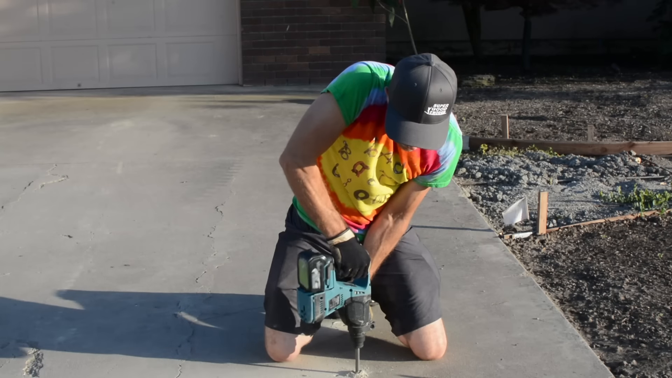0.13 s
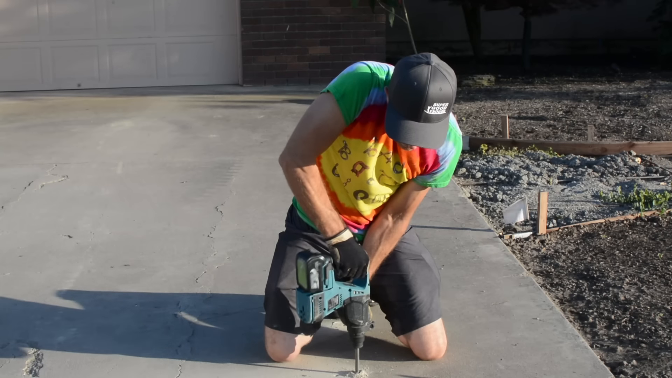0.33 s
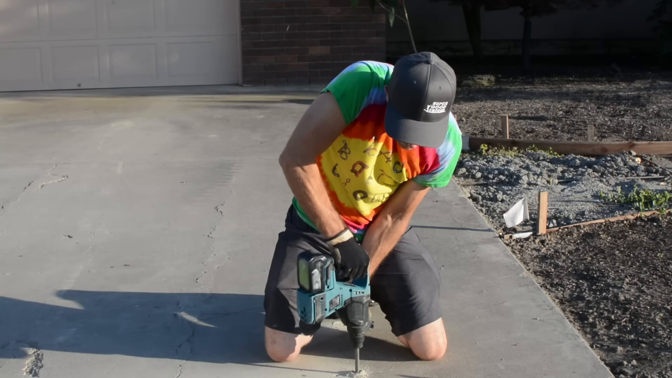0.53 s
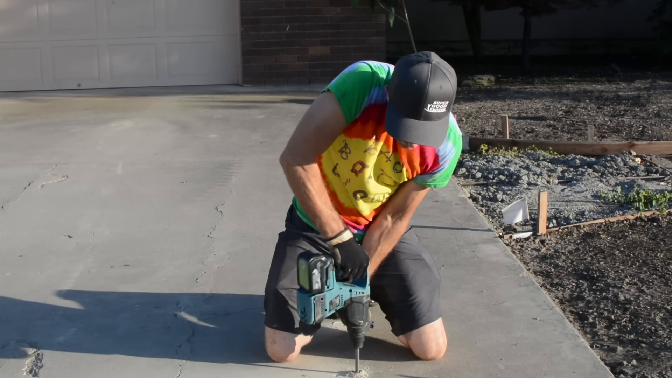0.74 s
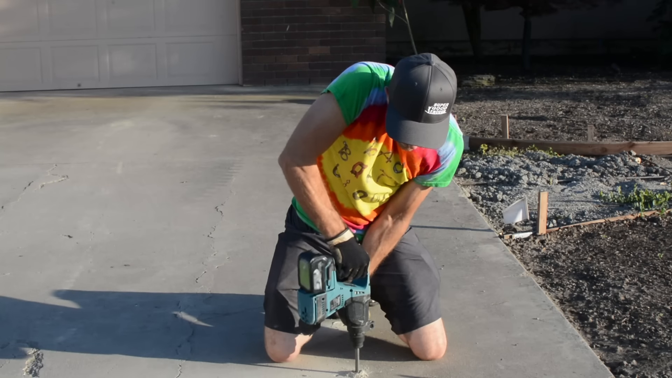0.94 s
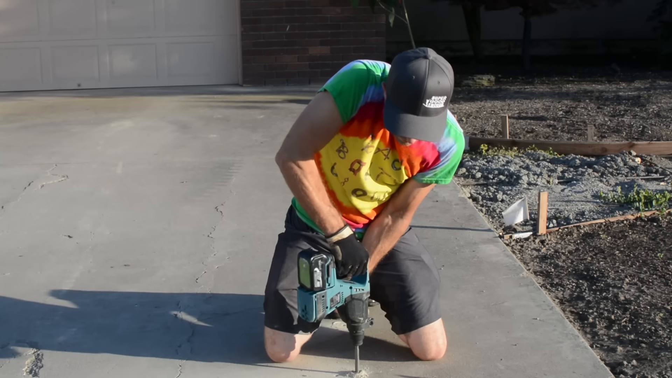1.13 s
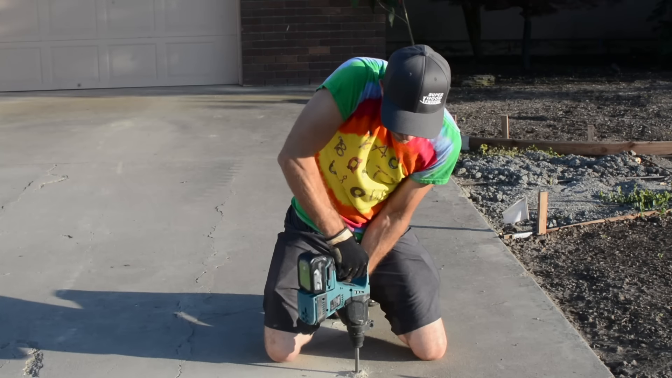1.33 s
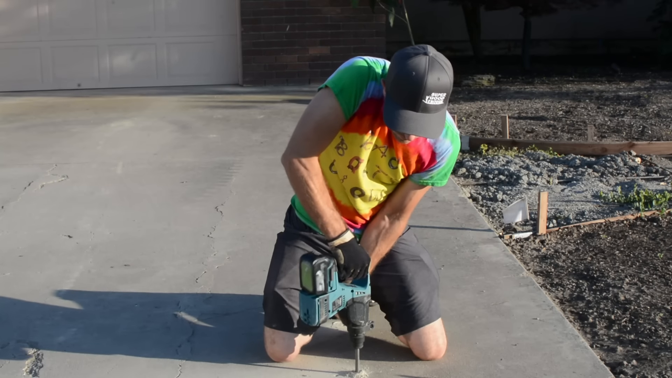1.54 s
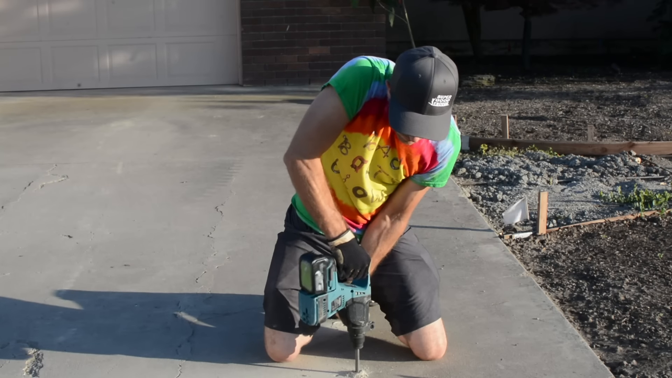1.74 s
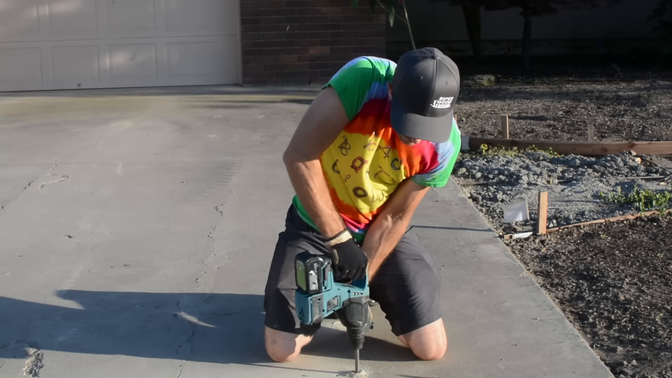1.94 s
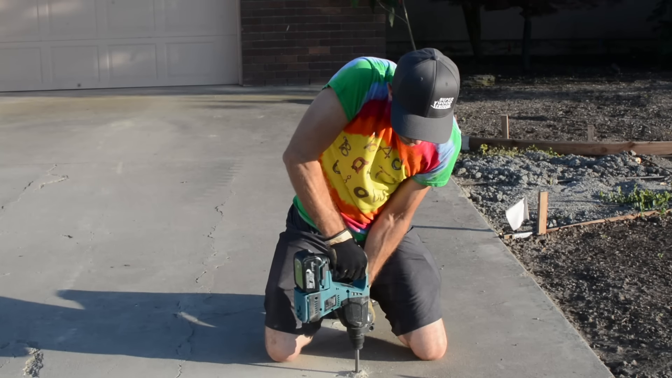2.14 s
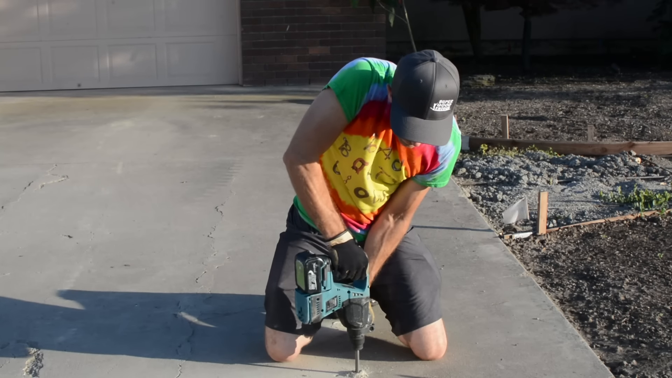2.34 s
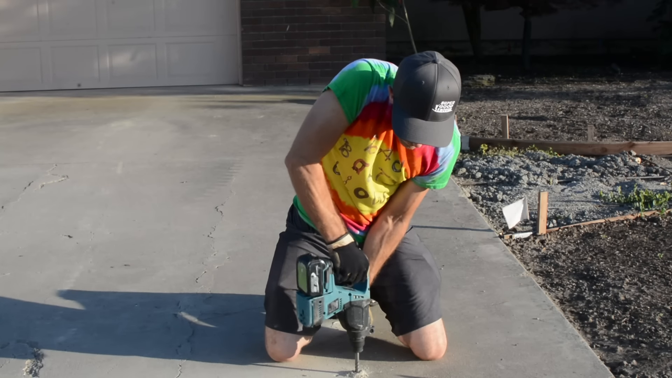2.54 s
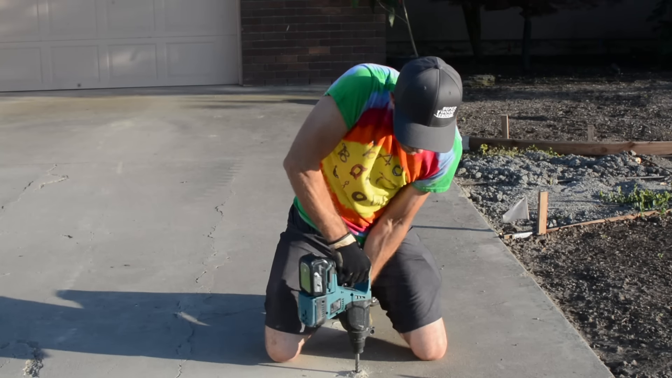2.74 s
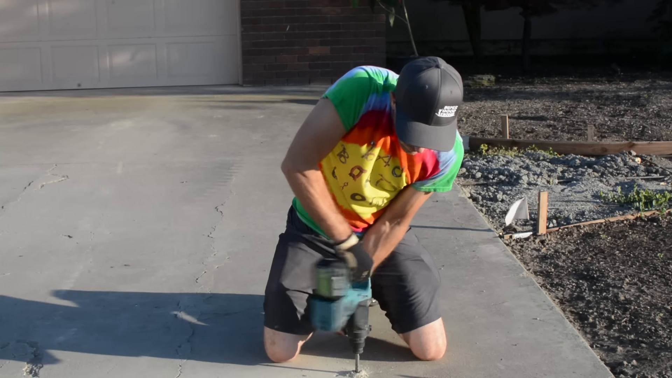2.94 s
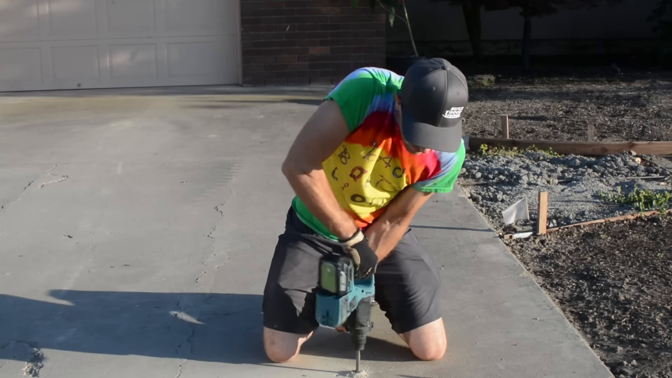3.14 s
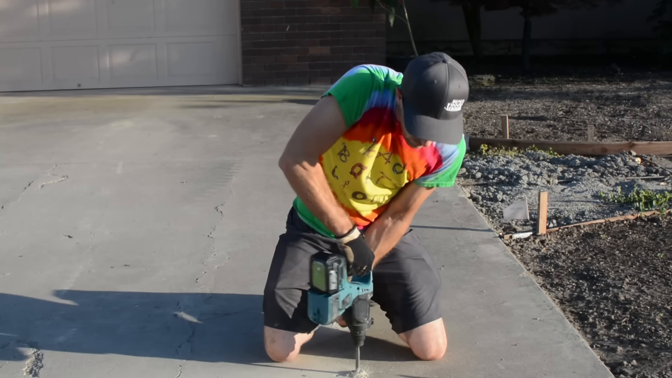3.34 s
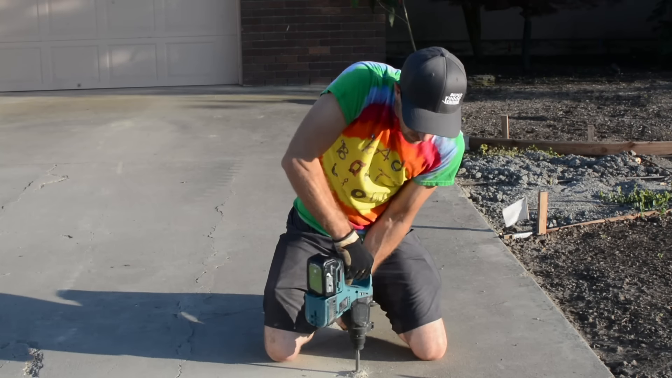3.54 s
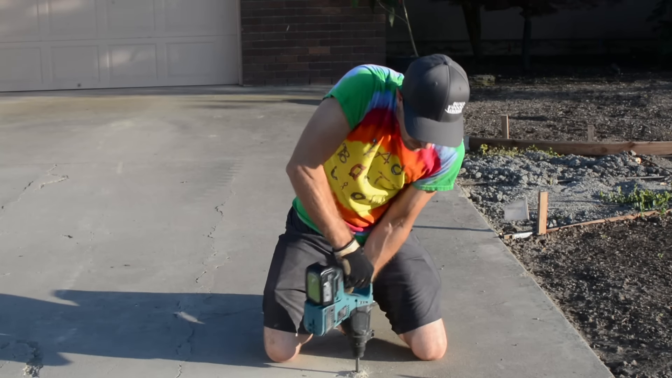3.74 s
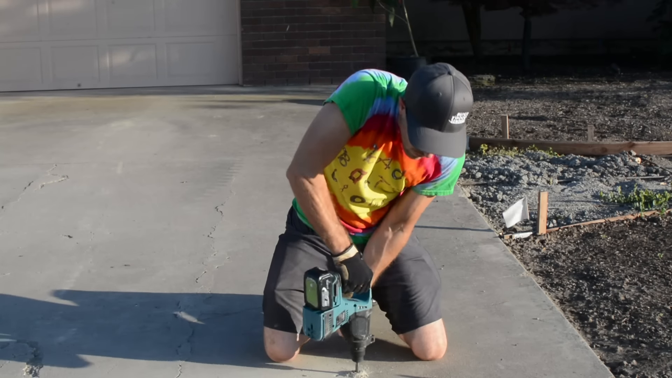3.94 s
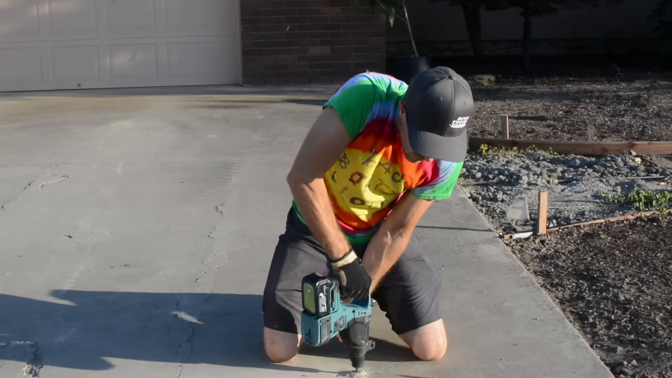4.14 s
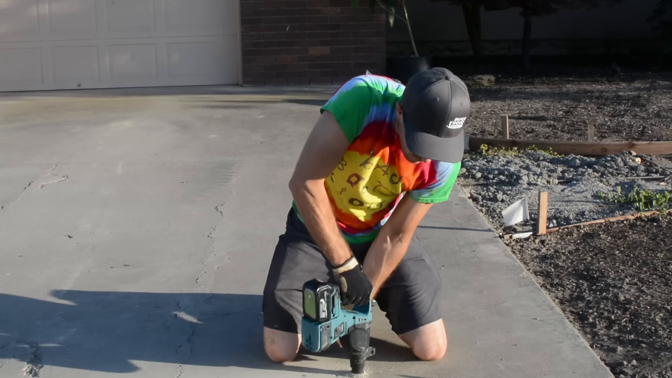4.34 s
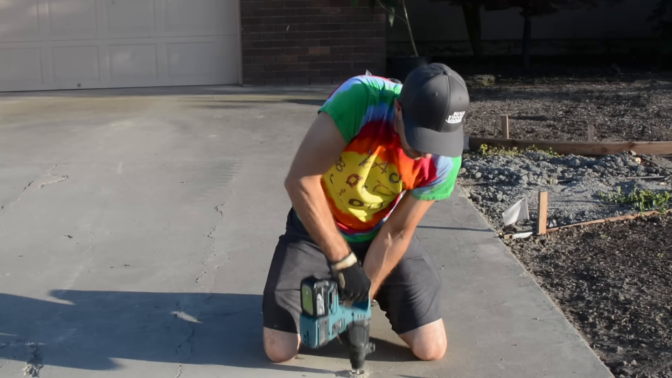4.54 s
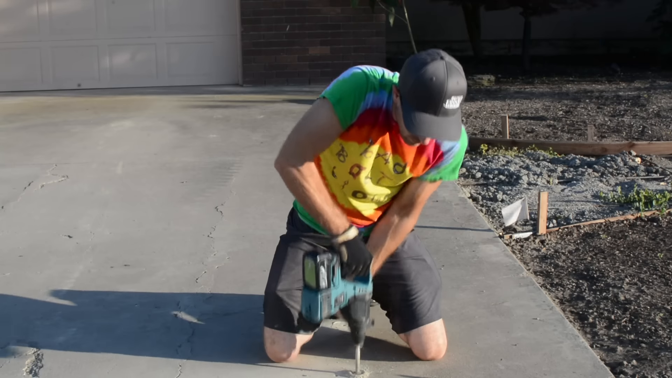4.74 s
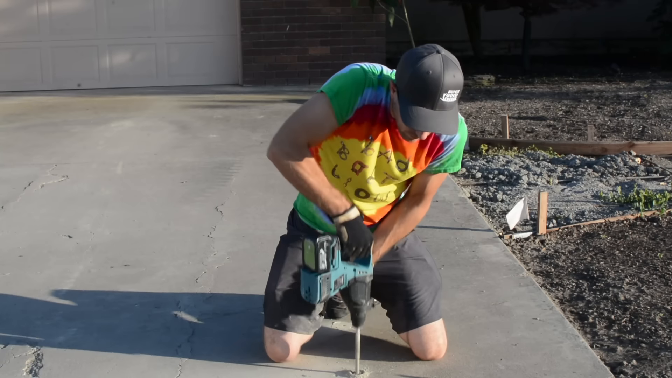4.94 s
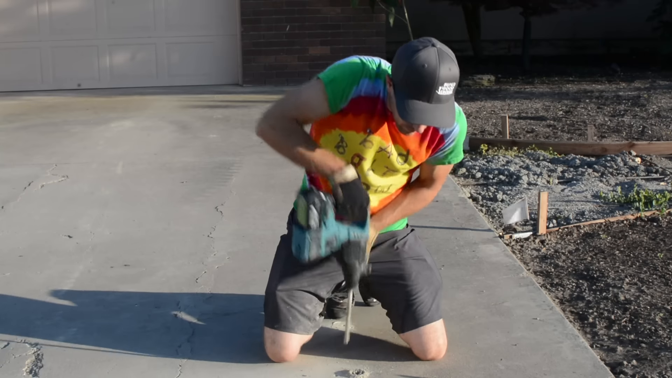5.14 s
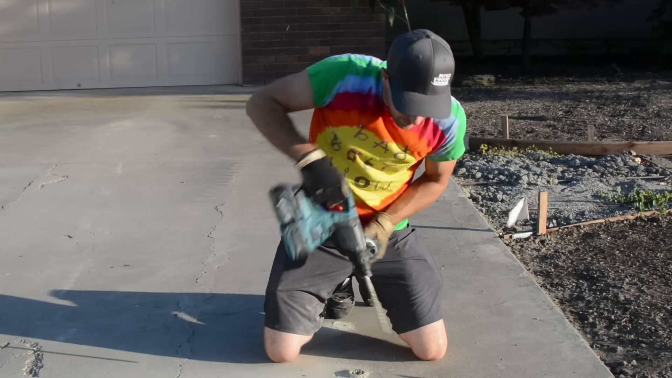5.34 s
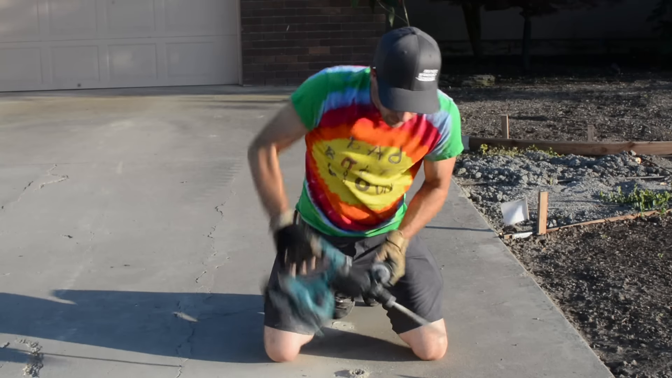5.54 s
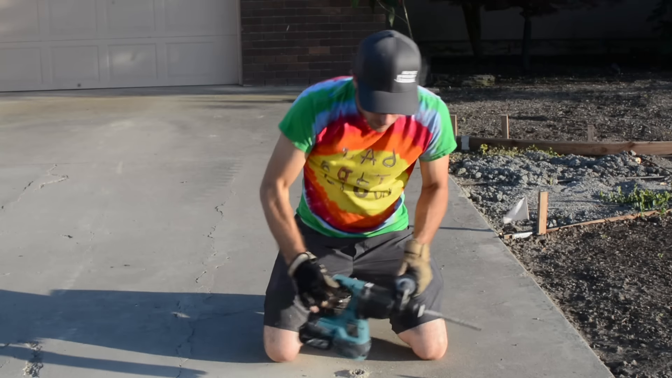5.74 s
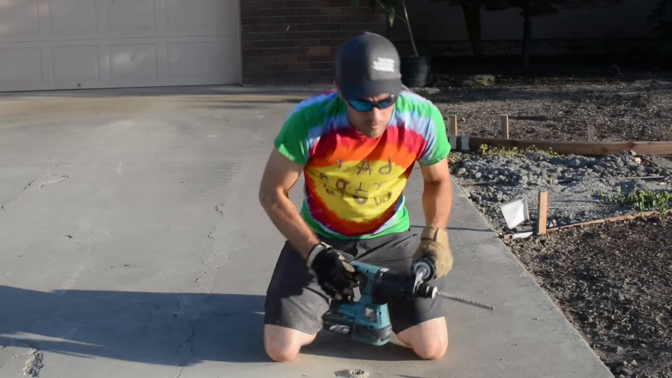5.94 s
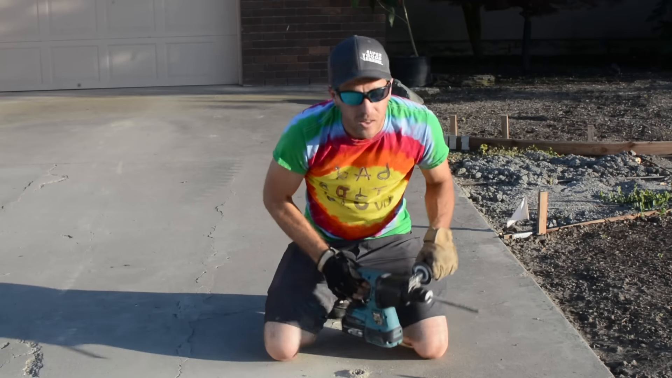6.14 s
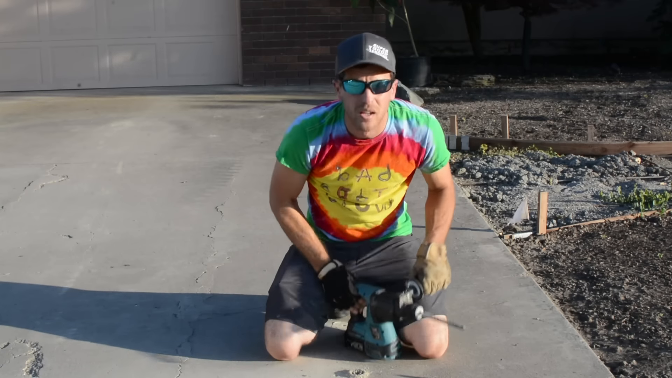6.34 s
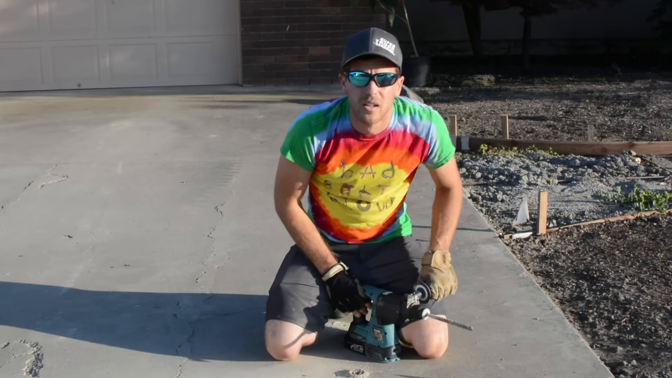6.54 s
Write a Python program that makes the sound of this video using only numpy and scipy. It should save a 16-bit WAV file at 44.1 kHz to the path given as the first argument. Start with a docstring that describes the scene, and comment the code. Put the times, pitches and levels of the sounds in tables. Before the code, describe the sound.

Close outdoor view of a cordless hammer drill boring concrete: fast, hard, gritty blows with metallic bit ringing and clattering gears. It briefly skips, hammers again, then bucks roughly and stalls twice. A freer gear rattle and whirr follows as the bit is pulled out, then a quick stop. Quiet suburb, faint bird whistles, a tool knock. Wind bumps the microphone.

```python
"""A rotary hammer drill bores into concrete outdoors: noise bursts crack and bit modes ring over rattling gears.
The bit skips, then binds and bucks; the motor stalls twice, and the drill spins free while it is pulled out.
The trigger is let go and the brake bites; a far bird gives short whistles, and the tool is set down with a knock.
Filtered-noise wind buffets the microphone, near surfaces and a wall send the sound back, a quiet suburb lies behind."""
import sys
import numpy as np
from scipy import signal
from scipy.fft import rfft, irfft
from scipy.io import wavfile
from scipy.ndimage import uniform_filter1d, map_coordinates

SR = 44100
rng = np.random.default_rng(int(sys.argv[2]) if len(sys.argv) > 2 else 0)


def materialize(psi):
    """Save the field psi as 16-bit PCM at rate SR to the path in sys.argv[1].

    A 1-D psi becomes a single channel; in a 2-D psi each row is a channel.
    """
    bounded = np.clip(np.atleast_2d(psi).T, -1, 1)
    quanta = np.round(bounded * 32767).astype(np.int16)
    wavfile.write(sys.argv[1], SR, quanta)


N = 290619

# The march of the piston. Each row: time in seconds, strokes so far.
STROKES = [(0, 0.64), (0.1357, 10), (0.2826, 20), (0.5776, 40), (0.8794, 60), (0.9965, 68), (1.1057, 76),
           (1.4602, 103), (1.5652, 111), (1.9566, 138), (2.0756, 146), (2.3496, 165), (2.4846, 174),
           (2.6004, 181), (2.6172, 182), (2.9355, 203), (3.2, 219), (3.45, 238.56), (5.09, 367.98),
           (5.2, 374.68)]
# Tone of crushed concrete in the hole. Each row: frequency in Hz, relative spectral level in dB.
GRIND_TONE = [(130, -20.5), (220, -10.5), (290, 0), (450, 1), (800, 6), (1200, 0.5), (1600, -38.5)]


def undb(db):
    """Turn decibels into an amplitude factor."""
    return 10 ** (np.asarray(db) / 20)


def curve(table, at):
    """Read the columns of a time table at the given times, in straight lines between rows."""
    s, *columns = np.transpose(table)
    return [np.interp(at, s, column) for column in columns]


def unit(x):
    """Scale a signal to rms 1."""
    return x / np.sqrt(np.mean(x ** 2))


def noise():
    """White noise for the whole scene."""
    return rng.standard_normal(N)


def colour(x, points, tilt_db=0):
    """Minimum-phase filter through (Hz, dB) points, tilted in dB per octave, with unit gain on white noise."""
    hz, db = np.transpose(points)
    octave = np.log2(np.maximum(np.arange(2049) * SR / 4096, 1))
    level_db = np.interp(octave, np.log2(hz), db) + tilt_db * (np.maximum(octave, 7) - 10)
    # folding the cepstrum forward makes the filter causal
    cepstrum = irfft(level_db * np.log(10) / 20)
    cepstrum[1:2048] *= 2
    cepstrum[2049:] = 0
    response = irfft(np.exp(rfft(cepstrum)))
    return signal.fftconvolve(x, response / np.sqrt(np.sum(response ** 2)))[:len(x)]


def spikes(s, size):
    """Place one impulse per event."""
    out = np.zeros(N)
    np.add.at(out, np.clip((np.asarray(s) * SR).astype(int), 0, N - 1), size)
    return out


def fade(x, t60):
    """Let each impulse die away exponentially, by 60 dB in t60 seconds."""
    return signal.lfilter([1], [1, -np.exp(-np.log(1000) / (t60 * SR))], x)


def ring(x, hz, t60):
    """One damped mode whose pitch may move; a unit impulse gives an envelope that starts at 1."""
    turn = np.exp(2j * np.pi * np.cumsum(hz * np.ones(N)) / SR)
    return (1j * np.conj(turn) * fade(x * turn, t60)).real


def burst(s, size, rise, t60):
    """Envelope that swells over the contact time and then dies away."""
    k = max(int(rise * SR), 1)
    return uniform_filter1d(fade(spikes(s, size), t60), k, origin=(k - 1) // 2)


def walk(rate):
    """Random drift of rms 1: noise smoothed twice over 1/rate seconds."""
    k = int(SR / rate)
    return unit(uniform_filter1d(uniform_filter1d(noise(), k), k))


def narrow(x, hz, width_hz):
    """Noise moved into a band round a centre that may glide; rms 1."""
    slow = signal.sosfilt(signal.butter(2, width_hz / 2, fs=SR, output="sos"), x)
    return unit(slow * np.sin(2 * np.pi * np.cumsum(hz * np.ones(N)) / SR))


def stroke_times(count):
    """Times in seconds at which the piston reaches the given stroke counts."""
    s, strokes = np.transpose(STROKES)
    return np.interp(count, strokes, s)


def blows():
    """Steady strokes crack the concrete and ring the bit; the turning cutting edges shift and weight them."""
    # The bite of the bit. Each row: time in seconds, blow level in dB, ringing level in dB,
    # extra level of the lower bit modes in dB; all before the offsets and chance below.
    bite = [(0, -24, -42, -1.5), (1.0, -23.5, -42.5, 4.5), (1.12, -27, -39.5, -7), (1.15, -28.5, -45, -10),
            (1.175, -39, -53.5, -9.5), (1.3, -50, -52.5, -18.5), (1.42, -34, -49.5, -12),
            (1.46, -36.5, -44, -10), (1.52, -25, -34.5, -0.5), (1.8, -24, -33, -4.5), (2.3, -26, -34.5, -4),
            (2.6, -28, -33.5, -6.5)]
    edges_per_stroke, edge_lag_s = .395, .00069
    count = np.arange(1, 182)
    edge = 2 * np.pi * edges_per_stroke * count
    chance = rng.standard_normal((len(count), 8))
    s = stroke_times(count) + edge_lag_s * np.cos(edge) + .0004 * chance[:, 0]
    blow_db, ring_db, lower_db = curve(bite, s)
    blow_db = blow_db - 1.6 * np.sin(edge) + .65 * np.cos(edge) + 1.8 * chance[:, 1]
    ring_db = ring_db + 15.5 - 6.1 * np.sin(edge)
    buck_s, buck_db, thud_db = bucks()
    # only the hard bucks thud; light ones stay thin
    thud = np.maximum(undb(thud_db) - .2, 0)
    # a hard buck also jolts the whole tool at once
    jolt = spikes(buck_s + 0.0027, thud)
    return (concrete(s, blow_db, chance[:, 2], buck_s, buck_db, thud, jolt)
            + bit_ring(s, ring_db, lower_db, chance[:, 3:], jolt))


def concrete(s, blow_db, chance, buck_s, buck_db, thud, jolt):
    """Noise bursts crack sharply on top, while slab and housing swell later and carry on longer below."""
    # Tone of struck concrete. Each row: frequency in Hz, relative spectral level in dB.
    crack_tone = [(250, -10), (800, 3.5), (1500, 6), (2800, 5), (5000, 4.5), (6500, -3), (8000, -2),
                  (11500, -2.5), (13000, -2.5), (15800, -12)]
    low_pass, high_pass = [signal.butter(4, 4200, kind, fs=SR, output="sos") for kind in ("low", "high")]
    low = burst(s, undb(blow_db + 13.5 + 0.34 * chance), 0.0023, 0.029)
    low = low + undb(8) * burst(buck_s + .0005, thud, .0016, .018)
    # a sharp attack and a longer, weaker spray
    high = burst(s, undb(blow_db + 14.0), 0.00041, 0.0027)
    high = high + burst(s, undb(blow_db + 8.5), 0.0004, 0.013)
    high = high + burst(buck_s, undb(buck_db - 3.5), 0.00089, 0.011)
    body = signal.sosfilt(low_pass, colour(low * noise(), crack_tone))
    crack = signal.sosfilt(high_pass, colour(high * noise(), crack_tone))
    body = body + undb(3.0) * signal.sosfilt(low_pass, colour(jolt, crack_tone))
    # steel meets steel: a dry click opens every steady blow
    click = colour(spikes(s + .0002, undb(blow_db + 24.0)), crack_tone)
    # the housing answers with a short clank of drifting pitch
    clank = spikes(s + 0.00087, undb(blow_db + 10 + 2.2 * chance))
    clank = ring(clank, 2750 * (1 + 0.14 * walk(60)), 0.016)
    # each blow pushes the slab the same way, so the lows buzz at the blow rate
    buzz = colour(spikes(s, undb(blow_db + 26.5)) + undb(-8.0) * jolt, GRIND_TONE)
    return body + crack - click + clank + buzz


def bit_ring(s, ring_db, lower_db, chance, jolt):
    """The steel bit rings in damped modes that rise as it is clamped deeper in the hole."""
    # Modes of the steel bit. Each row: frequency in Hz before the seating factor, relative level in dB,
    # 60 dB decay in seconds.
    modes = [(5160, -11, 0.0055), (5600, 2, 0.0056), (8890, -2.5, 0.015), (12750, -3, 0.013),
             (13320, -7, 0.006)]
    # Accents in the ringing of the bit, some of which prolong a ring. Each row: time in seconds,
    # relative level in dB, extra level of the lower modes in dB.
    accents = [(0.5485, -11, -2), (0.8938, -10, -6), (1.039, -11, 1), (1.079, -5.5, 0), (1.084, -2.5, -2),
               (1.09, -4.5, -8), (1.11, 3, -4), (1.111, -8.5, -4), (1.116, -10, -3.5), (1.397, -17.5, 1),
               (1.432, -23, -13), (1.462, -22.5, 9), (1.333, -11, 0.5), (1.5275, -12, -8),
               (1.784, -9.5, -20), (2.0465, -10, -20.5), (2.0897, -9, -16.5), (2.119, -7, -17)]
    # Clamping of the bit. Each row: time in seconds, pitch factor.
    clamping = [(0, 0.94), (1.45, 1.01), (1.8, 1.005), (2.2, 1.017), (2.6, 1.03)]
    pitch_spread = 0.0096
    accent_s, accent_db, accent_lower_db = np.transpose(accents)
    # jolts ring the two lowest modes
    out = sum(ring(jolt, hz * (1 + 0.022 * walk(40)), t60) for hz, _, t60 in modes[:2])
    seat, = curve(clamping, np.arange(N) / SR)
    for k, (hz, db, t60) in enumerate(modes):
        lower = hz < 10000
        taps = spikes(s + 0.00019, undb(ring_db + lower * lower_db + 2.7 * chance[:, k]))
        taps = taps + spikes(accent_s + .0005, undb(accent_db + lower * accent_lower_db - 0.5))
        out = out + undb(db) * ring(taps, hz * (seat + pitch_spread * walk(70)), t60)
    return out * undb(2.0 * walk(900))


def bucks():
    """Times, crack dB and thud dB of the hard bucks, the thin piston ticks, the stray and the hard blows."""
    # The bound bit bucks hard. Each row: time in seconds, relative crack level in dB, relative thud level in dB.
    bound = [(2.6157, -4.5, -4.5), (2.6424, -7.5, -3.5), (2.6716, -8, -5.5), (2.6963, -12, -4.5),
             (2.724, -11, -4), (2.7489, -3.5, -7.5), (2.773, -11.5, -4), (2.7988, -16, -5.5),
             (2.8248, -10.5, -4.5), (2.8527, 0, -4), (2.8771, -6.5, -3), (2.9026, -11, -4.5),
             (2.929, -6, -5)]
    # Stray blows as the bit skips, the motor stalls and catches, and the bit rattles on its way out.
    # Each row: time in seconds, relative crack level in dB, relative thud level in dB.
    strays = [(1.333, -13, -20), (1.398, -18, -20), (2.957, -21.5, -25), (2.972, -19, -20),
              (3.04, -17, -10.5), (3.057, -6, -9.5), (3.075, -19, -18), (3.095, -12, -7.5),
              (3.106, -16, -8.5), (3.1296, -19, -9), (3.137, -16, -24), (3.1587, -17, -17),
              (3.1991, -15.5, -19), (3.212, -9, -10), (3.2177, -13, -6.5), (3.238, -27, -16),
              (3.257, -9, -9.5), (3.324, -12.5, -22), (3.541, -14.5, -20), (3.605, -15, -20),
              (3.676, -23.5, -20), (3.736, -12.5, -20), (3.92, -20, -18), (3.987, -15.5, -20),
              (4.25, -17, -28), (4.35, -20.5, -22), (4.58, -21, -22), (4.82, -15, -22)]
    # Blows that hit hard stone and thud through the housing. Each row: time in seconds, relative thud level in dB.
    hard_stone = [(0.0605, -11), (0.179, -8.5), (0.2538, -10), (0.4437, -9), (0.7137, -12), (0.7896, -17.5),
                  (0.9664, -8), (1.023, -11), (1.5788, -13.5), (1.6099, -9.5), (1.7655, -13.5),
                  (1.801, -10), (1.9116, -11.5), (1.9437, -10.5), (1.9834, -9.5), (2.062, -11),
                  (2.176, -11.5), (2.335, -12.5)]
    tick_db, tick_spread_db, silent_db = -12.5, 7, -60.
    tick = stroke_times(np.arange(182, 204))
    chance = rng.standard_normal((len(tick), 2))
    tick = tick + .0004 * chance[:, 1]
    ticks = tick, tick_db + tick_spread_db * chance[:, 0], np.full(len(tick), silent_db)
    hard_s, hard_db = np.transpose(hard_stone)
    hard = hard_s, np.full(len(hard_s), silent_db), hard_db
    return np.concatenate([np.transpose(bound), ticks, np.transpose(strays), hard], axis=1)


def grind(strokes, grind_db):
    """Crushed concrete grates in the hole as coloured noise that swells at each stroke."""
    swell = .5 + np.exp(-(strokes % 1) / 0.61)
    return undb(grind_db + 0.5) * unit(colour(swell * noise(), GRIND_TONE))


def gears(strokes, rattle_db, boom_db, whirr_hz):
    """Teeth clatter twice a stroke, each knock its own size, with hum, whirr and housing resonances."""
    # Tone of the rattle. Each row: frequency in Hz, relative spectral level in dB.
    rattle_tone = [(180, -39), (300, -34), (398, -16), (519, -17), (711, -1.5), (911, -6.5), (1060, -9),
                   (1360, -6), (1600, -5), (2350, -0.5), (3010, 1.5), (3380, -6.5), (5030, -5),
                   (6140, -15.5), (7300, -18.5), (8300, -22), (11300, -26), (13300, -28.5), (15800, -35.5)]
    # Hum of the gearbox. Each row: multiple of the stroke rate, level in dB against the rattle before drift.
    hum_partials = [(3, -45), (4, -37), (5, -33), (6, -38), (8, -23), (9, -23), (9.2, -21), (10, -22),
                    (10.6, -24), (13.2, -25), (14, -26), (20, -24)]
    # Two housing resonances that change with grip and tilt. Each row: time in seconds,
    # level of the lower in dB, level of the upper in dB, frequency of the upper in Hz.
    grip = [(2.9, -38.5, -38.5, 1870), (3.3, -6, -33.5, 1850), (3.8, -19.5, -27, 1800),
            (4.2, -10.5, -10, 1880), (4.6, -16.5, -3, 1860), (4.8, -18, -14, 1630), (5.1, -15.5, -14, 1617)]
    whirr_db_per_khz = 6.5  # the whirr stands out more as it sinks
    beat = 2 * strokes
    size = undb(2.3 * rng.standard_normal(1000))[beat.astype(int)]
    # a knock opens each beat, a smaller one falls halfway
    gate = 0.92 + 1.27 * size * np.exp(-(beat % 1) / 0.18) + 0.4 * np.exp(-((beat + .5) % 1) / 0.12)
    # part of the chatter repeats every stroke
    teeth = rng.standard_normal(600)[(strokes % 1 * 600).astype(int)]
    chatter = undb(2.8 * rng.exponential(size=N)) * noise() + 0.53 * teeth
    rattle = unit(colour(gate * chatter, rattle_tone))
    hum = sum(undb(db + 2.9 * walk(21.0)) * np.sin(2 * np.pi * k * strokes) for k, db in hum_partials)
    whirr_db = -10.5 + whirr_db_per_khz * (2.5 - whirr_hz / 1000)
    whirr = undb(whirr_db) * unit(gate * narrow(noise(), whirr_hz, 240))
    boom = undb(boom_db) * narrow(gate * noise(), 1080., 242)
    lower_db, upper_db, upper_hz = curve(grip, np.arange(N) / SR)
    boom = boom + undb(lower_db) * narrow(gate * chatter, 740., 180)
    boom = boom + undb(upper_db) * narrow(gate * chatter, upper_hz, 220)
    return undb(rattle_db + 1.5 + 0.5 * walk(100)) * (rattle + hum + whirr + boom)


def slowdown(t):
    """Motor level in dB lost in the stalls and after the trigger is let go."""
    # Motor stalls. Each row: deepest point in seconds, depth in dB, slowing in seconds, recovery in seconds.
    stalls = [(2.998, 26.5, 0.065, 0.076), (3.171, 12, 0.082, 0.066)]
    # Trigger let go, then the brake bites. Each row: start in seconds, added fall in dB per second.
    stop = [(5.098, 129), (5.173, 1300.5)]
    dips = sum(db * np.interp(t, [s - down, s, s + up], [0, 1, 0]) for s, db, down, up in stalls)
    return dips + sum(rate * np.maximum(t - s, 0) for s, rate in stop)


def fan(t):
    """The cooling fan hisses as a wide band of noise with a gliding centre."""
    # The fan's air. Each row: time in seconds, level in dB before slowdown and flutter, centre in Hz.
    air = [(0, -51, 9000), (3.2, -48.5, 9100), (3.6, -41.5, 9310), (4.1, -46.5, 10530), (4.5, -42, 11450),
           (4.8, -46, 11000), (5.1, -43.5, 9800)]
    fan_db, fan_hz = curve(air, t)
    return undb(fan_db - slowdown(t) + 2.5 * walk(18)) * narrow(noise(), fan_hz, 5000)


def knocks(t):
    """Contacts send decaying noise through the body of the tool, and its housing gives short tones."""
    # Tone of the tool body. Each row: frequency in Hz, relative spectral level in dB.
    tool_tone = [(59, -42), (100, -1), (1140, 6.5), (1330, -5), (2900, -6), (3590, -12), (5140, -21.5),
                 (7690, -36), (8730, -34.5), (15800, -56)]
    # Handling and setting down. Each row: time in seconds, relative level in dB, tilt in dB per octave,
    # 60 dB decay in seconds.
    contacts = [(6.234, -44, 12.5, 0.013), (6.268, -45, 1, 0.013), (6.457, -14, 2.5, 0.039),
                (6.466, -18, 4, 0.049), (6.474, -31, -1, 0.037), (6.484, -32, 11, 0.025),
                (6.489, -22, -0.5, 0.036), (6.498, -26, 0.5, 0.048), (6.505, -36, 2.5, 0.09),
                (6.535, -42, 3, 0.03), (6.545, -27.5, 6.5, .012)]
    # Short housing tones. Each row: start in seconds, peak envelope in dB before flutter, frequency in Hz,
    # decay in seconds.
    bonks = [(1.486, -4, 898, 0.01), (1.554, -4.5, 904, 0.013), (1.695, -12.5, 945, 0.023),
             (1.765, -11, 2715, 0.016), (2.596, -5.5, 890, 0.014), (3.112, -11, 2485, 0.027),
             (5.522, -53, 2560, 0.0044)]
    hits = 0
    for s, db, tilt_db, t60 in contacts:
        hits = hits + colour(fade(spikes([s], undb(db - 4.0)), t60) * noise(), tool_tone, tilt_db)
    tones = 0
    for s, db, hz, t60 in bonks:
        age = np.maximum(t - s, 0) * np.log(1000) / t60
        # each tone swells, then dies
        tones = tones + undb(db) * age * np.exp(1 - age) * np.sin(2 * np.pi * hz * t)
    return hits + undb(1.4 * walk(400)) * tones


def bounces(near, t):
    """Delayed copies with lifted treble, since hard surfaces mirror the treble better; lags wobble slowly."""
    # Bounce off the slab, shifting with the tilt of the tool and weaker as it is lifted.
    # Each row: time in seconds, lag in ms before wobble, level in dB.
    slab = [(0, 0.36, -13), (.8, 0.41, -13.5), (1.2, 0.42, -13.5), (2.3, 0.38, -12.5), (2.9, 0.38, -13),
            (3.3, .43, -14), (3.8, 0.45, -18), (4.2, 0.399, -23.5), (4.5, 0.39, -14), (4.8, 0.42, -26.5),
            (5.2, 0.5, -29)]
    # Bounce off the worker's knees. Each row: time in seconds, lag in ms before wobble, level in dB.
    knees = [(0, 0.71, -23), (3.2, 0.87, -42), (3.75, 0.8, -12), (4.1, 0.85, -18), (4.4, .7, -17),
             (4.75, 0.8, -20), (5.2, 0.8, -17.5)]
    # Bounce off the battery pack. Each row: time in seconds, lag in ms before wobble, level in dB.
    pack = [(0, .56, -36), (.6, 0.51, -25), (2.9, .55, -26.5), (3.6, 0.56, -20), (4.0, .53, -19),
            (5.2, 0.51, -18)]
    treble_hz, treble_db, wobble_ms = 6000, -14, .006
    treble = signal.filtfilt(*signal.butter(2, treble_hz, "high", fs=SR), near)
    bright = near + undb(treble_db) * treble
    out = 0
    for surface in (slab, knees, pack):
        lag_ms, db = curve(surface, t)
        heard_from = t - (lag_ms + wobble_ms * walk(0.91)) / 1000
        out = out + undb(db) * map_coordinates(bright, [heard_from * SR])
    return out


def wall(near):
    """A wall returns a short, dull tail: decaying low-passed noise that starts 12 ms late."""
    t60_s, level_db, top_hz = 0.31, -21.5, 4500
    tail = fade(spikes([.012], 1), t60_s)[:SR // 2] * rng.standard_normal(SR // 2)
    tail = signal.sosfilt(signal.butter(1, top_hz, fs=SR, output="sos"), tail)
    return undb(level_db) * signal.fftconvolve(near, tail / np.sqrt(np.sum(tail ** 2)))[:N]


def breeze(t):
    """Wind on the microphone: low noise that flutters all the time and swells in gusts."""
    # Tone of the buffeting. Each row: frequency in Hz, relative spectral level in dB.
    wind_tone = [(15, -6), (35, -0.5), (70, 0), (110, -8.5), (200, -17), (400, -55.5)]
    # Restless breeze. Each row: time in seconds, level in dB before flutter.
    restless = [(0, -70), (1.5, -60), (2.2, -48), (3.0, -67), (3.5, -31.5), (3.75, -42), (3.85, -69.5),
                (4.05, -64), (4.35, -46.5), (5.1, -47), (5.2, -51.5), (5.6, -59.5), (6.59, -59)]
    # Gusts. Each row: centre in seconds, peak level in dB, half length to 1/e in seconds.
    gust_list = [(.33, -36, 0.06), (.81, -44, 0.037), (1.32, -42, 0.033), (1.69, -44.5, .03),
                 (1.91, -28, 0.048), (2.62, -40, 0.029), (2.88, -30, 0.018), (3.251, -39, 0.061),
                 (3.5, -33, 0.037), (3.71, -31, 0.028), (4.43, -42, 0.092), (4.74, -32, 0.054),
                 (5.281, -39.5, 0.034), (5.36, -44, .03), (5.47, -40, 0.017), (6.171, -58.5, 0.05)]
    gusts = sum(undb(db) * np.exp(-((t - s) / half) ** 2) for s, db, half in gust_list)
    steady = undb(curve(restless, t)[0] + 2.2 * walk(8.2))
    return (steady + gusts) * unit(colour(noise(), wind_tone))


def bird(t):
    """A far bird gives short blurred whistles: narrow noise under bell-shaped envelopes."""
    # Chirps. Each row: centre in seconds, peak envelope in dB, frequency in Hz.
    chirps = [(5.67, -71.5, 2960), (5.71, -75, 3250), (5.745, -67.5, 2550), (5.78, -72, 3010),
              (5.81, -66.5, 2560), (5.85, -70, 2750), (5.87, -68, 2470), (6.06, -76, 4600),
              (6.115, -69, 2880), (6.23, -70, 2800)]
    half_s, width_hz = .018, 200
    return sum(undb(db) * np.exp(-((t - s) / half_s) ** 2) * narrow(noise(), hz, width_hz)
               for s, db, hz in chirps)


def suburb():
    """A quiet suburb as a steady bed of coloured noise."""
    # Tone of the suburb. Each row: frequency in Hz, relative spectral level in dB.
    suburb_tone = [(59, -26), (100, -11), (150, 1.5), (163, -4), (441, -12), (620, -15), (1000, -7),
                   (1750, -19.5), (2610, -18.5), (3740, -25), (4620, -26), (6220, -29.5), (15800, -30)]
    return undb(-60.5) * colour(noise(), suburb_tone)


def scene():
    """Mix the tool, its bounces and wall tail, and the outdoor background, as one channel."""
    # The motor and its load. Each row: time in seconds, gear rattle in dB and grinding in the hole in dB
    # (both before slowdown and trim), housing boom in dB against the rattle, whirr in Hz.
    motor = [(0, -21, -24.5, -7.5, 2767), (.9, -22.5, -28.5, -6, 2720), (1.12, -18.5, -23.5, -4, 2670),
             (1.17, -17.5, -35, -7.5, 2593), (1.45, -19.5, -34.5, -6.5, 2600), (1.5, -21, -27, -5, 2748),
             (2.4, -20.5, -26, -9.5, 2740), (2.58, -22, -34, -6, 2760), (2.65, -19, -24.5, -13, 2590),
             (2.93, -21, -27, -7, 2708), (3.3, -19, -37, -4, 2542), (3.7, -19, -41, -10, 2605),
             (4.4, -19, -57, -42, 2362), (4.75, -19.5, -43, -10.5, 2250), (5.0, -19, -44.5, -12, 2158),
             (5.1, -19, -49, -8.5, 1958)]
    t = np.arange(N) / SR
    strokes, = curve(STROKES, t)
    rattle_db, grind_db, boom_db, whirr_hz = curve(motor, t)
    lost_db = slowdown(t)
    near = blows() + grind(strokes, grind_db - 0.46 * lost_db)
    near = near + gears(strokes, rattle_db - lost_db, boom_db, whirr_hz)
    near = near + fan(t) + knocks(t)
    near = near + bounces(near, t)
    return (near + wall(near) + breeze(t) + bird(t) + suburb())[None]


def record(dry):
    """The loudest peaks clip, then a steep low-pass cuts the top."""
    top_hz = 15900
    return signal.sosfilt(signal.ellip(10, .2, 60, top_hz, fs=SR, output="sos"), np.clip(dry, -.95, .95))


dry = scene()
out = record(dry)
materialize(out)
```